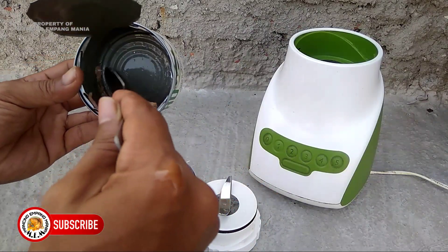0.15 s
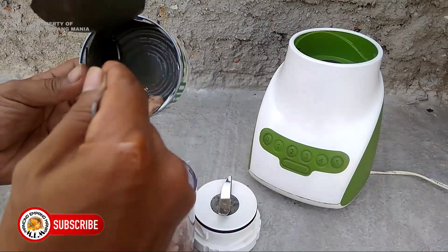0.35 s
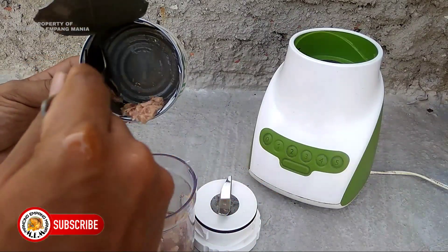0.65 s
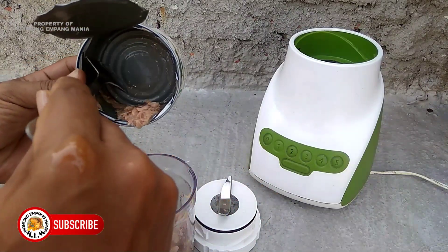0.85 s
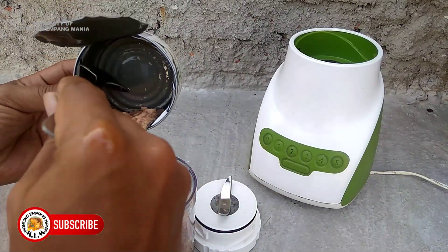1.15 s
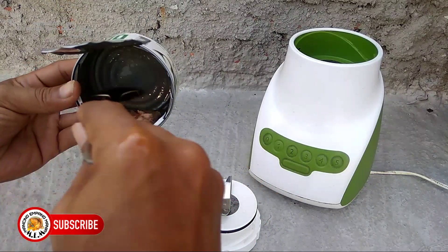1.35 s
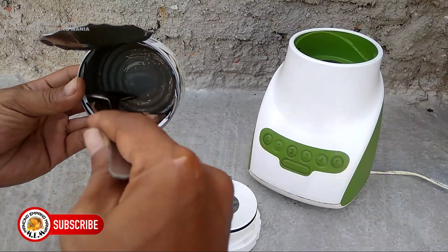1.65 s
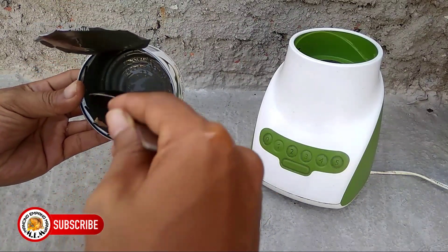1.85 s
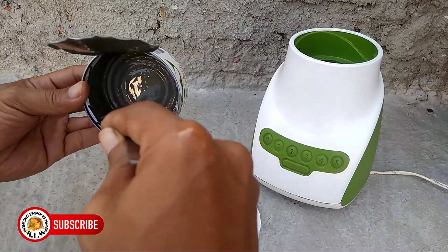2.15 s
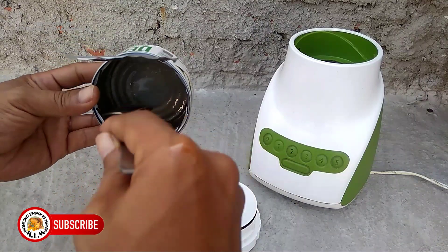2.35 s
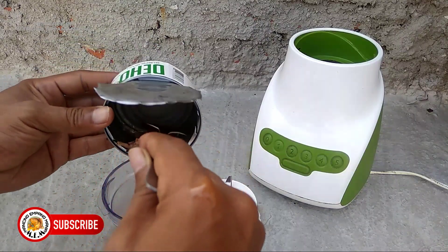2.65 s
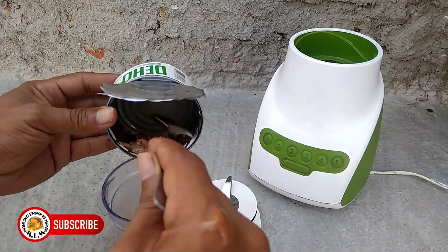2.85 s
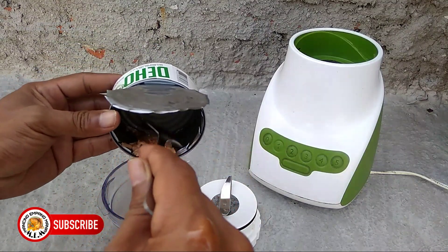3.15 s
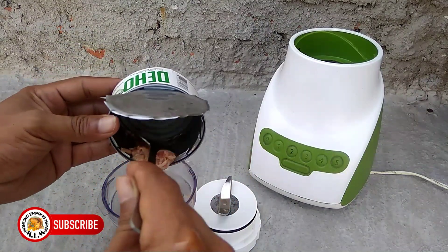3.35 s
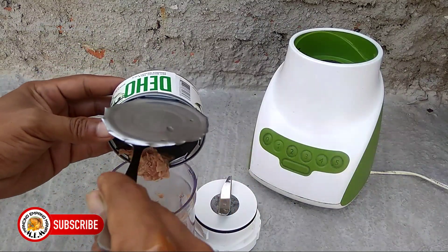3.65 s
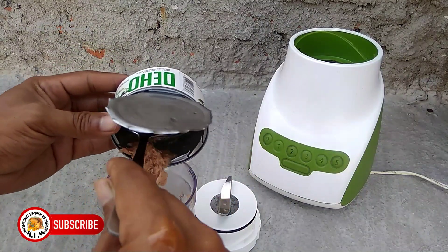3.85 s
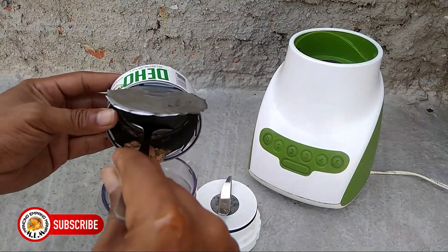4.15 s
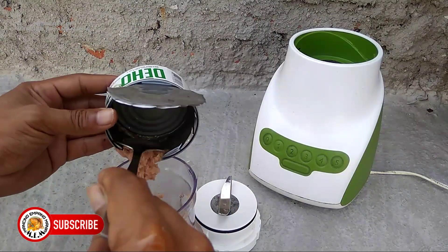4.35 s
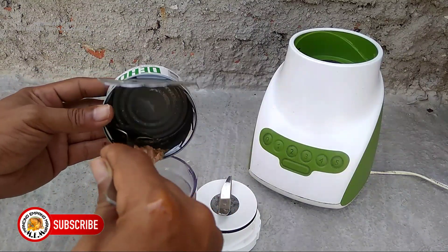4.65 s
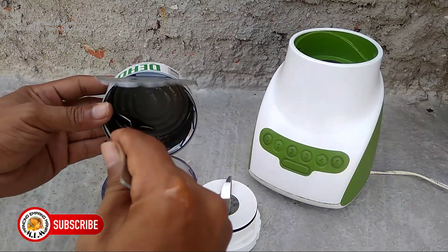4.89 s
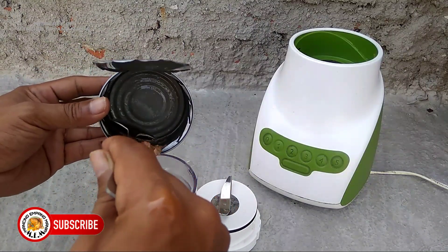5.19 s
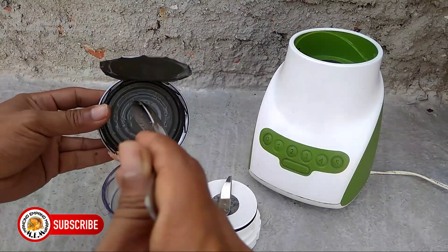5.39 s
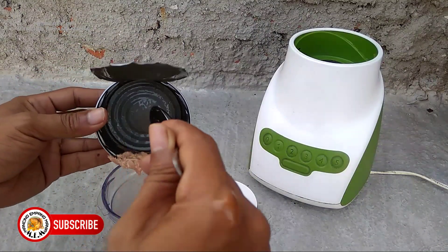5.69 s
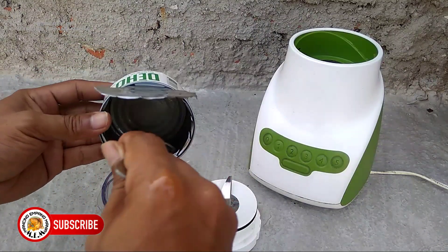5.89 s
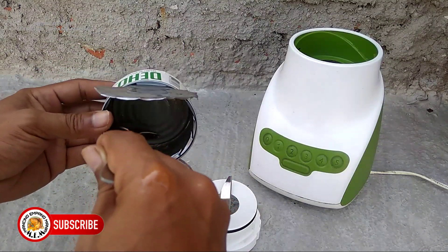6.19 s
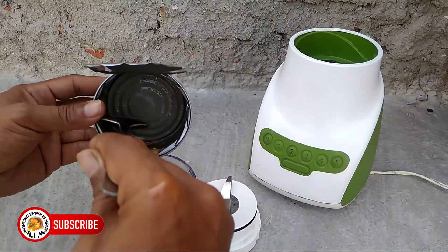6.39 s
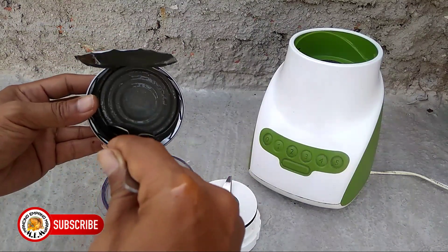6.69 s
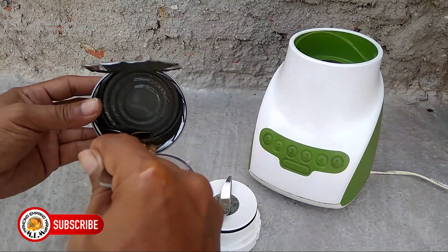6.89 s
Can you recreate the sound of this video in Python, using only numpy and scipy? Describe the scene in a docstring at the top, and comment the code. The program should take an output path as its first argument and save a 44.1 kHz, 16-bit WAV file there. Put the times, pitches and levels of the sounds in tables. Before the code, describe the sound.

A metal spoon knocks, clacks and scrapes irregularly inside a nearly empty tin can, close up, over a low outdoor rumble.

```python
"""Spoon and tin can

A metal spoon scoops moist food out of a hand-held tin can, heard from close by in a walled yard.
Each blow is a damped knock, padded by food, and then a clack of noisy metal contact that rings the can's modes.
Filtered noise makes the light brush after each blow, the scrapes, the wet smears and the rub of fingers.
The walls answer with a decaying noise tail; a low rumble, a faint hiss and small, buzzy bird chirps lie behind."""
import sys
import numpy as np
from scipy import signal
from scipy.fft import rfft, irfft, next_fast_len
from scipy.io import wavfile
from scipy.ndimage import uniform_filter1d, map_coordinates

SR = 44100
rng = np.random.default_rng(int(sys.argv[2]) if len(sys.argv) > 2 else 0)


def dump(signal):
    """Clip the signal to [-1, 1] and save it as 16-bit WAV at the path in sys.argv[1]."""
    limited = np.clip(np.atleast_2d(signal).T, -1, 1)
    pcm = np.round(limited * 32767).astype(np.int16)
    wavfile.write(sys.argv[1], SR, pcm)


N = 310023

# Source levels and gains are those before the left-right balance and the band limit.
# Spoon blows on the wall: contact_s, knock_peak_db, padding (0 bare to 1 full of food),
# hiss_db, body_db, chatter_t60_s
STRIKES = [(0.107, -35.5, 0.3, -40.5, -45, .04), (0.1215, -23.5, 0.6, -32.5, -32, 0.027),
           (0.195, -27.5, .65, -49.5, -40, 0.048), (0.465, -30.5, 0.72, -32.5, -30.5, 0.039),
           (0.704, -37, .05, -45, -41, 0.09), (.7327, -29, 0.83, -35, -32.5, 0.024),
           (0.7584, -24, 0.9, -38.5, -39.5, 0.0051), (0.9953, -31, 0.83, -37, -37, 0.016),
           (1.0758, -33.5, 0.7, -32.5, -34, 0.024), (1.2929, -25.5, 0.42, -37, -36, 0.023),
           (1.482, -31, 0.19, -33.5, -34, 0.036), (1.716, -38.5, 0.44, -50, -39, 0.044),
           (1.7519, -27.5, 0.34, -31, -35, 0.014), (1.8521, -32, 0.86, -38.5, -36.5, 0.01),
           (2.0877, -29, 0.66, -53, -40, .04), (2.152, -29.5, .65, -29.5, -32, 0.019),
           (2.44, -38, 0, -43.5, -41.5, .018), (2.4693, -24, 0.64, -35, -35.5, 0.013),
           (3.1302, -21.5, 0.8, -32.5, -36, 0.04), (3.4329, -27.5, 0.78, -31.5, -39, .01),
           (4.0246, -25, 1, -34, -32.5, 0.017), (4.052, -42, .6, -33.5, -32.5, 0.029),
           (4.3569, -42, 0.4, -39.5, -38.5, 0.044), (4.3782, -32.5, .7, -36, -41.5, 0.037),
           (4.6917, -28.5, 0.07, -31, -31, 0.0076), (4.764, -27.5, 0.67, -30.5, -33.5, 0.069),
           (5.0027, -23.5, 0.91, -31.5, -31.5, 0.016), (5.065, -36, 0.4, -31, -34.5, .016),
           (5.5186, -25.5, 0.52, -49.5, -38.5, 0.15), (5.9356, -38, 0.26, -33.5, -33, 0.011),
           (6.277, -25, 0.93, -38, -33.5, 0.016), (6.354, -38, 0.99, -37, -35, 0.035),
           (6.5638, -23.5, .45, -33.5, -32.5, 0.018), (6.704, -32.5, 0.91, -36.5, -43.5, 0.029),
           (6.8919, -28.5, 0.84, -42, -35, 0.045)]
# Touches of the bare edge, with no push behind them: contact_s, hiss_db
EDGE_TICKS = [(1.0852, -32.5), (1.3487, -35.5), (2.461, -38.5), (3.1352, -32), (3.231, -56.5),
              (3.3875, -43.5), (3.5182, -48), (4.153, -39), (4.635, -49.5), (5.877, -44.5), (5.945, -40.5),
              (5.985, -43.5), (6.023, -37), (6.346, -46), (6.366, -33.5), (6.548, -52.5), (6.574, -35),
              (6.9145, -38)]
# Drags of the edge along the wall: start_s, end_s, hiss_db, body_db (before the scrapes' body trim)
EDGE_DRAGS = [(0.179, 0.223, -39.5, -49), (.509, .533, -47, -50), (0.598, .612, -50, -50.5),
              (0.763, 0.829, -53, -56), (1.046, 1.062, -46, -48.5), (1.283, 1.336, -42, -36),
              (1.528, 1.559, -60.5, -47), (1.757, 1.876, -49, -46), (2.081, 2.146, -57.5, -66),
              (2.882, 2.913, -43.5, -44.5), (3.056, 3.125, -50.5, -47), (3.403, 3.448, -49.5, -49),
              (4.134, 4.193, -52, -45), (4.746, 4.745, -46.5, -41.5), (5.522, 5.582, -62, -59.5),
              (5.844, 5.914, -52.5, -44), (5.954, 6.024, -54.5, -53), (6.057, 6.148, -58.5, -57.5),
              (6.678, 6.703, -42, -39)]
# Modes of the can with its lid, before the random spread:
# frequency_hz, resonance_gain_db, t60_s
CAN_MODES = [(217, 14.5, 0.038), (372, 12.5, 0.091), (484, 14.5, 0.31), (532, 11, 0.17), (640, 14.5, 0.22),
             (651.4, 10.5, 0.049), (787, 15.5, 0.39), (872.6, 15, 0.16), (1101, 12, 0.11),
             (1273.6, 26.5, 0.13), (1400.6, 21.5, 0.045), (1447, 8, 0.034), (1758, 13, 0.24),
             (2280, 17, 0.14), (2490, -4, 0.047), (2752, 11.5, 0.09), (3460, 9, 0.059), (3550, 14, 0.018),
             (5300, 6, 0.028), (6400, -28.5, 0.06), (7235, 11, 0.0069), (9310, -1.5, 0.006),
             (11700, 3.5, 0.001), (12940, 17.5, 0.041)]
# Spectrum of the force in hard contact, before tilt: frequency_hz, gain_db
CONTACT_SPECTRUM = [(100, 0.5), (300, -2.5), (900, 0), (2000, -5.5), (3000, 0.5), (4200, -2.5), (5000, 4),
                    (8200, -0.5), (10000, 4), (12000, -3), (15000, -1.5)]
# Moist food that smears and comes loose: start_s, swell_s, peak_db, centre_hz
FOOD_SMEARS = [(0.873, 0.095, -72, 4500), (.879, .036, -66.5, 1500), (1.62, .04, -74.5, 1600),
               (2.98, 0.024, -64.5, 4000), (3.859, 0.011, -62, 1200), (3.861, 0.014, -70, 6550)]
# Shifts of the fingers on the can: start_s, end_s, level_db (before the uneven pressure)
FINGER_SHIFTS = [(0.542, 0.951, -62), (1.552, 2.003, -59.5), (2.196, 2.392, -62.5), (3.192, 3.411, -53.5),
                 (5.546, 5.689, -57), (6.404, 6.856, -56.5)]
# Spectrum of skin on the hollow can: frequency_hz, gain_db
SKIN_SPECTRUM = [(180, -17.5), (280, 0), (370, 0.5), (480, -13.5), (650, -19.5), (1200, -51.5),
                 (3000, -81.5)]
# Chirps of the bird: start_s, length_s, peak_db
BIRD_CHIRPS = [(0.009, 0.11, -63.5), (2.354, 0.096, -54.5), (3.799, 0.085, -53.5), (4.483, 0.068, -55)]
# Decay of the yard's answer: frequency_hz, t60_s
YARD_DECAY = [(200, 1), (1000, 0.47), (4000, 0.41), (10000, 0.33), (15000, 0.47)]
# Swell of the rumble, before its lift: time_s, level_db
RUMBLE_SWELL = [(0.0, -45.5), (0.51, -48), (1.17, -46.5), (1.8, -49.5), (2.41, -46), (3.33, -49.5),
                (4.89, -49), (5.97, -53.5), (6.34, -46), (7.03, -47.5)]
# Spectrum of the rumble: frequency_hz, gain_db
RUMBLE_SPECTRUM = [(20, -18), (45, -10.5), (72, 0.5), (107, 1.5), (150, -7.5), (220, -8), (320, -22.5),
                   (420, -31.5), (500, -24), (700, -55), (1200, -52), (2000, -63.5), (3300, -110)]
# Spectrum of the faint hiss: frequency_hz, gain_db
AIR_SPECTRUM = [(500, 15), (1500, -9.5), (4000, -3), (7000, -10.5), (11000, -6.5), (13000, -0.5),
                (16000, -13.5)]
# Lag at the left port, which follows the can as the hand moves it: time_s, lag_ms
PORT_LAG = [(0, 0.2), (1.8, 0.19), (3.3, .115), (7, 0.19)]
# Difference in level between the ports: frequency_hz, left_minus_right_db
PORT_BALANCE = [(100, 6.5), (300, 3.5), (750, 4), (2000, 4.5), (5000, 4), (9000, 3), (15000, 0)]

SPLIT_HZ = 2400  # hollow body below, bright hiss above
TOP_HZ = 15400  # band limit
KNOCK_LEAD_S = 0.0085  # the knock starts this long before the metal touches

# Padding lowers the push and smothers the hollow swing (levels relative to the push).
BARE_HZ, PADDED_HZ, PADDING_POWER = 719, 430, 3.0
BARE_HOLLOW_DB, PADDED_HOLLOW_DB = 18, -24.5

# Harder contacts are brighter: hiss level with no tilt; dB per octave for each dB above it.
NEUTRAL_DB, BRIGHTER_PER_DB = -29, 0.1
# Ticks: chatter decay; body relative to hiss; dB per octave.
TICK_T60_S, TICK_BODY_DB, TICK_TILT_DB = 0.035, -7, 1
SCRAPE_TILT_DB = 1.1  # dB per octave

# The brush after a blow: delay and length; levels relative to the blow, before the scrapes' body trim.
BRUSH_AFTER_S, BRUSH_S = 0.054, 0.024
BRUSH_HISS_DB, BRUSH_BODY_DB = -27, -27.5


def knocks(cycles=0.31, hollow_t60=0.057):
    """Impulse and damped oscillation: the loaded spoon pushes the wall in and it swings against the food."""
    out, t = np.zeros((2, N)), contact_time()
    for contact_s, peak_db, padding, *_ in STRIKES:
        hz = BARE_HZ + (PADDED_HZ - BARE_HZ) * padding ** PADDING_POWER
        hollow_db = BARE_HOLLOW_DB + (PADDED_HOLLOW_DB - BARE_HOLLOW_DB) * padding
        u = (t * hz - 2 * cycles) / cycles
        push = can(u * np.exp(-u ** 2))
        onset = 1 - np.exp(-t * hz)
        swing = -np.sin(2 * np.pi * hz * t) * amp(-60 * t / hollow_t60) * onset
        sound = push / np.abs(push).max() + amp(hollow_db) * swing
        add(out, contact_s - KNOCK_LEAD_S, amp(peak_db) * sound / np.abs(sound).max())
    return out


def clacks(settle_db=-14, settle_t60=0.082, rise=0.00058, graze_db=-14, graze=0.0022):
    """Impact noise with two decays: bare metal grazes, hits, chatters and settles."""
    lead = 0.008  # seconds of graze before the hit
    out, t = np.zeros((2, N)), contact_time() - lead
    after = np.maximum(t, 0)
    for contact_s, hiss_db, body_db, t60, tilt_db in metal_contacts():
        decay = amp(-60 * after / t60) + amp(settle_db - 60 * after / settle_t60)
        hit = decay * (1 - np.exp(-after / rise))
        envelope = hit + amp(graze_db) * np.exp(-np.abs(t) / graze)
        sound = rasp(envelope, 0.0097, hiss_db, body_db, tilt_db, rough=0.3)
        add(out, contact_s - lead, sound)
    return out


def metal_contacts():
    """Contact stiffening, harder is brighter: contact_s, hiss_db, body_db, t60_s, tilt in dB per octave."""
    blows = [(s, hiss, body, t60, BRIGHTER_PER_DB * (hiss - NEUTRAL_DB))
             for s, _, _, hiss, body, t60 in STRIKES]
    ticks = [(s, db, db + TICK_BODY_DB, TICK_T60_S, TICK_TILT_DB) for s, db in EDGE_TICKS]
    return blows + ticks


def scrapes(body_trim_db=-1, rise=0.0038, release_t60=0.08, judder_db=3, pressure_db=2):
    """Stick-slip friction: the edge catches and slips on the tin as the hand's pressure wavers."""
    out, t = np.zeros((2, N)), contact_time()
    for start, end, hiss_db, body_db in drags():
        length = max(end - start, 0.005)
        release = amp(-60 * np.maximum(t - length, 0) / release_t60)
        stroke = (1 - np.exp(-t / rise)) * release
        judder = judder_db * flutter(len(t), rate=200)
        pressure = pressure_db * flutter(len(t), rate=45)
        envelope = stroke * amp(judder + pressure)
        sound = rasp(envelope, length, hiss_db, body_db + body_trim_db, SCRAPE_TILT_DB, rough=0.11)
        add(out, start, sound)
    return out


def drags():
    """Elastic rebound: to the scrapes it adds a light brush as the spoon springs back after each blow."""
    brushes = []
    for contact_s, _, _, hiss_db, body_db, _ in STRIKES:
        start = contact_s + BRUSH_AFTER_S
        brushes.append((start, start + BRUSH_S, hiss_db + BRUSH_HISS_DB, body_db + BRUSH_BODY_DB))
    return list(EDGE_DRAGS) + brushes


def rasp(envelope, length, hiss_db, body_db, tilt_db, rough, apart=1.0, spot_db=3.0):
    """Rough contact as a noise force on a resonator; body and hiss get the energy of their rms over length."""
    n = len(envelope)
    grit = np.exp(rough * flutter(n, rate=900)) * rng.standard_normal((2, n))
    # The spot touched favours some bands of the wall and misses others.
    bands = np.arange(0, TOP_HZ, 400)
    spot = spot_db * rng.standard_normal(len(bands)) * (bands > SPLIT_HZ / 2)

    def colour(hz):
        tilt = tilt_db * np.log2(np.maximum(hz / SPLIT_HZ, 1))
        gain = amp(along(CONTACT_SPECTRUM, hz) + np.interp(hz, bands, spot) + tilt)
        # Short waves reach the two ports less alike.
        return gain * [np.ones_like(hz), apart * hz / (hz + SPLIT_HZ)]

    mid, side = filtered(envelope * grit, colour)
    sound = can(np.array([mid + side, mid - side]))
    out = 0
    for kind, db in (("low", body_db), ("high", hiss_db)):
        band = signal.sosfilt(signal.butter(4, SPLIT_HZ, kind, fs=SR, output="sos"), sound)
        out = out + amp(db) * unit(band) * np.sqrt(length * SR / n)
    return out


def can(force, vary_db=5.5, damp=0.24, detune=0.013, skew=0.43,
        sheet_db=7, sheet_t60=0.045, sheet_skew=0.87, count=26):
    """Modal superposition: direct force plus modes; spot, pressure and grip vary strength, pitch and life."""
    t = contact_time()
    strength_chance, skew_chance, pitch_chance, life_chance = rng.standard_normal((4, len(CAN_MODES) + count))
    # The thin sheet has too many high modes to list: each contact wakes a different handful.
    sheet_hz = rng.uniform(1500, TOP_HZ, count)
    sheet = np.column_stack([sheet_hz, np.full(count, sheet_db), np.full(count, sheet_t60)])
    hz, db, t60 = np.vstack([CAN_MODES, sheet]).T
    hz = hz * (1 + detune * pitch_chance)
    # Scaling by the decay rate makes each level a gain at resonance.
    strength = 2 * np.log(1000) / (t60 * SR) * amp(db + vary_db * strength_chance)
    t60 = t60 * np.exp(-damp * np.abs(life_chance))
    # Each mode radiates with its own opposite phase shifts at the two ports.
    phase = skew_chance * np.where(hz < SPLIT_HZ, skew, sheet_skew)
    ports = np.exp(1j * np.outer([1, -1], phase))
    ring = np.zeros((2, len(t)))
    ring[:, 0] = 1  # the force heard directly
    for gain, f, life in zip((strength * ports).T, hz, t60):
        u = t[:int(life * SR)]
        mode = np.exp((2j * np.pi * f - np.log(1000) / life) * u)
        ring[:, :len(u)] += np.outer(gain, mode).real
    return signal.fftconvolve(np.atleast_2d(force), ring, axes=1)[:, :len(t)]


def food(octaves=0.54):
    """Band-limited crackle: each smear is a soft squelch that swells and fades."""
    out, t = np.zeros((2, N)), contact_time()
    for start, swell, peak_db, centre in FOOD_SMEARS:
        crackle = rng.standard_normal(len(t)) * np.exp(0.5 * flutter(len(t), rate=850))
        wet = unit(filtered(crackle, lambda hz: 1 / (1 + (np.log2((hz + 1) / centre) / octaves) ** 4)))
        envelope = t / swell * np.exp(1 - t / swell)
        add(out, start, amp(peak_db) * wet * envelope)
    return out


def fingers(uneven_db=3):
    """Soft friction as dull noise: skin rubs unevenly on the hollow can."""
    out = np.zeros((2, N))
    for start, end, db in FINGER_SHIFTS:
        n = int((end - start) * SR)
        rub = unit(filtered(rng.standard_normal(n), lambda hz: amp(along(SKIN_SPECTRUM, hz))))
        level = amp(db + uneven_db * flutter(n, rate=22))
        add(out, start, rub * signal.windows.tukey(n) * level)
    return out


def bird(high_hz=4700, low_hz=3000, buzz_hz=550):
    """Frequency modulation: random pitch jitter makes faint chirps buzz as they slide down."""
    out, t = np.zeros((2, N)), contact_time()
    for start, length, peak_db in BIRD_CHIRPS:
        u = np.clip(t / length, 0, 1)
        buzz = unit(uniform_filter1d(rng.standard_normal(len(t)), size=20))
        hz = high_hz + (low_hz - high_hz) * u + buzz_hz * buzz
        tone = np.sin(2 * np.pi * np.cumsum(hz) / SR)
        add(out, start, amp(peak_db) * np.sin(np.pi * u) * tone)
    return out


def yard(x, wet_db=-17.0, build=0.002, apart=0.97):
    """Diffuse reverberation: noise tails decay by band, drawn anew each third of a second as the can moves."""
    block, out = len(contact_time()), np.zeros((2, N))
    for start in range(0, N, block):
        hz, s, z = signal.stft(noise_pair(SR // 2, apart), SR, nperseg=256)
        decay = amp(-60 * s / along(YARD_DECAY, hz)[:, None])
        tail = signal.istft(z * decay * (1 - np.exp(-s / build)), SR, nperseg=256)[1]
        tail = tail / np.linalg.norm(tail[0])
        answer = signal.fftconvolve(x[:, start:start + block], tail, axes=1)[:, :N - start]
        out[:, start:start + answer.shape[1]] += answer
    return amp(wet_db) * out


def background(rumble_lift_db=2, air_db=-82):
    """Shaped random noise: a low outdoor rumble swells and sinks under a faint, wavering hiss."""
    level = np.interp(np.arange(N) / SR, *np.transpose(RUMBLE_SWELL))
    rumble = unit(filtered(noise_pair(N, apart=0.13), lambda hz: amp(along(RUMBLE_SPECTRUM, hz))))
    air = unit(filtered(noise_pair(N, apart=0.27), lambda hz: amp(along(AIR_SPECTRUM, hz))))
    air_level = air_db + 2 * flutter(N, rate=2.1)
    return amp(level + rumble_lift_db) * rumble + amp(air_level) * air


def add(track, s, sound):
    """Superposition with arrival lag: mix a sound in at s seconds, a little later at the left port."""
    lag = np.interp(s, *np.transpose(PORT_LAG)) / 1000
    pair = np.broadcast_to(sound, (2, sound.shape[-1]))
    for port, part, late in zip(track, pair, (round(lag * SR), 0)):
        start = round(s * SR) + late
        port[start:start + len(part)] += part[:N - start]


def noise_pair(n, apart):
    """Partial coherence: two noises share a middle and oppose in a side part scaled by apart."""
    mid, side = rng.standard_normal((2, n))
    return unit(np.array([mid + apart * side, mid - apart * side]))


def flutter(n, rate):
    """Slow random modulation: a smooth curve through rate random knots a second."""
    return map_coordinates(rng.standard_normal(SR // 20), [np.arange(n) * rate / SR], mode="wrap")


def filtered(x, response):
    """Linear filtering: multiply the spectrum of x by a response of frequency."""
    n = x.shape[-1]
    m = next_fast_len(n + 4096)
    return irfft(rfft(x, m) * response(np.fft.rfftfreq(m, 1 / SR)), m)[..., :n]


def along(points, hz):
    """Logarithmic pitch: read (frequency_hz, value) points on a log frequency axis."""
    f, v = np.transpose(points)
    return np.interp(np.log(hz + 1), np.log(f), v)


def contact_time():
    """Finite decay: a time axis in seconds that holds one contact, a third of a second long."""
    return np.arange(SR // 3) / SR


def amp(db):
    """Level law: decibels to amplitude gain."""
    return 10 ** (np.asarray(db) / 20)


def unit(x):
    """Normalised power: x at rms 1."""
    return x / np.sqrt(np.mean(x ** 2) + 1e-20)


def scene():
    """Superposition of all sources, with the level balance between the ports set by frequency."""
    near = knocks() + clacks() + scrapes() + food() + fingers() + bird()
    sides = np.array([[0.5], [-0.5]])  # half the difference each way
    return filtered(near + yard(near) + background(), lambda hz: amp(sides * along(PORT_BALANCE, hz)))


def record(dry):
    """Band limitation: a steep low-pass at TOP_HZ, with nothing left from 16800 Hz up."""
    return filtered(dry, lambda hz: (hz < 16800) / np.sqrt(1 + (hz / TOP_HZ) ** 120))


dry = scene()
out = record(dry)
dump(out)
```